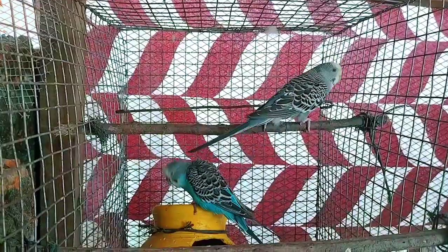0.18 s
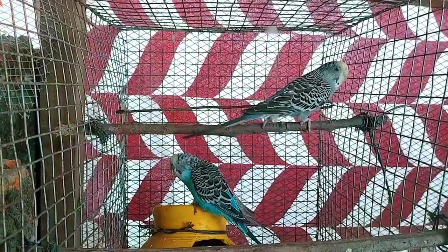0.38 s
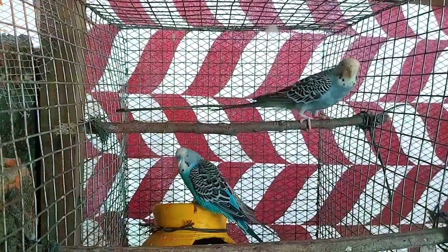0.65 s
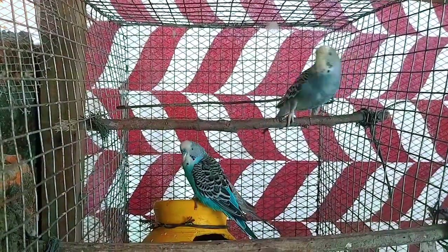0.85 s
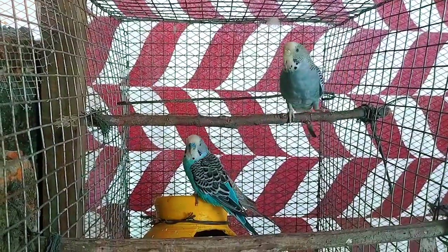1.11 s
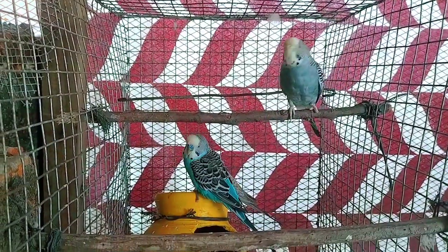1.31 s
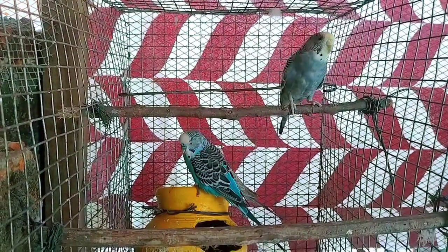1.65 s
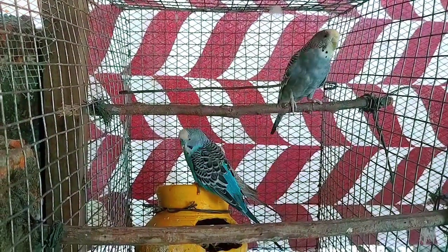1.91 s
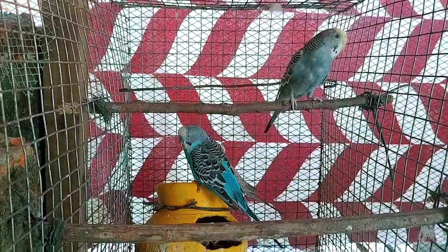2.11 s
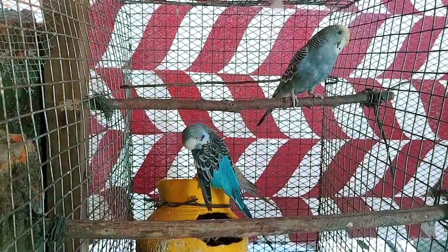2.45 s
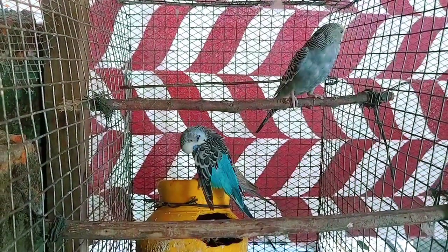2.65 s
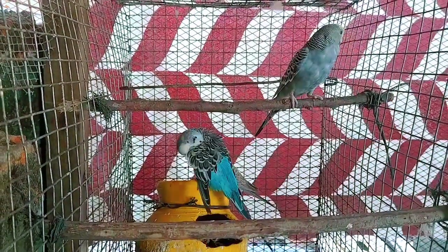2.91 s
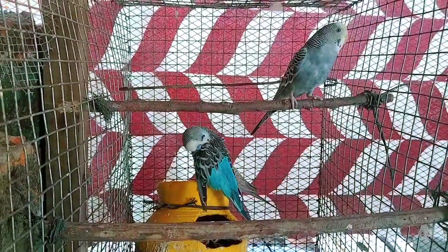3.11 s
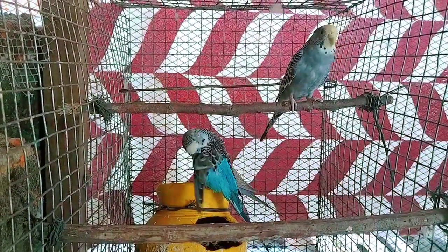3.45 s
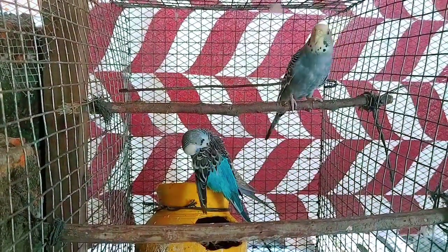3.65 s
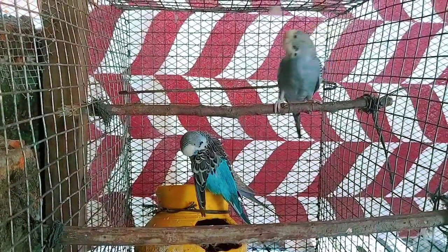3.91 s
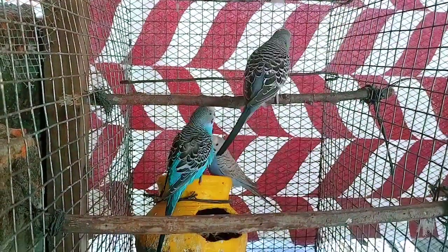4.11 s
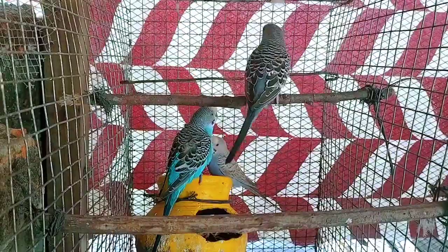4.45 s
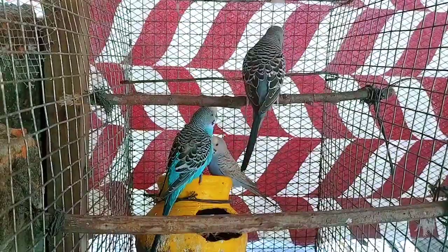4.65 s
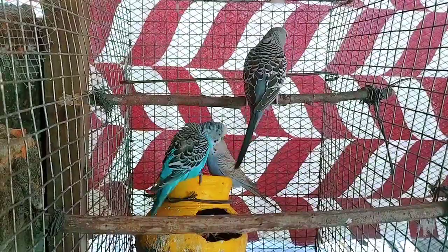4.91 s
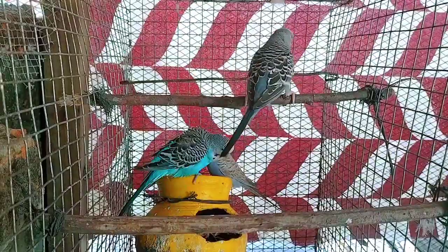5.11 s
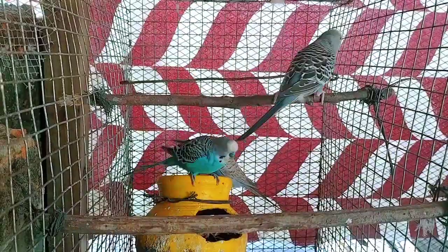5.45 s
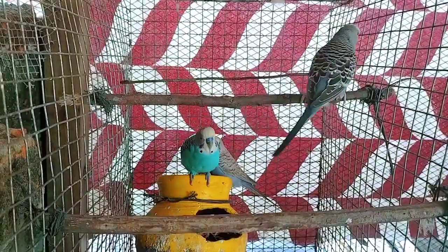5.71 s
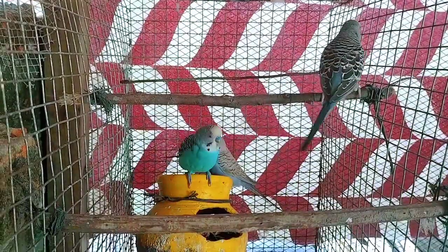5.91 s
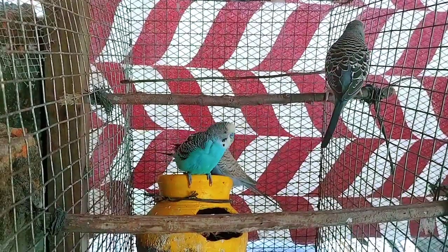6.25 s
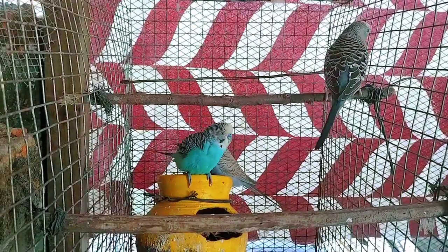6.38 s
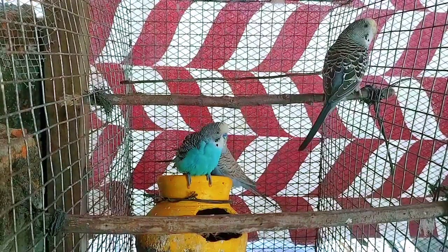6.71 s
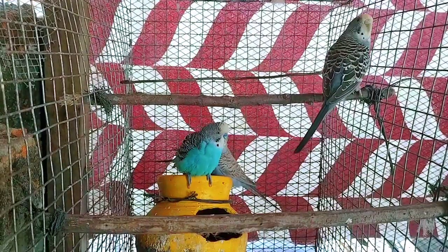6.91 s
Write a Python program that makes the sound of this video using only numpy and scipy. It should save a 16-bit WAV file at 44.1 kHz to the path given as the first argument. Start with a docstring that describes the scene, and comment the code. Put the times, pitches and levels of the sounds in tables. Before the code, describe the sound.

Close single-microphone sound of small caged parrots, with short hard reflections around each note. Chirps are very brief, gliding, sometimes pure, sometimes raspy, grouped in irregular bursts with gaps between. One dry buzzing scold comes early; a low quiet chatter appears past the middle and again near the end. Light ticks, faint hisses and rustling fill some gaps above a weak distant rumble, and a small knock closes it.

```python
"""An echoing aviary, budgerigars chirping and warbling around one microphone for about seven seconds.
Their notes are short gliding syllables, pure or raspy: a fluttering source coloured by throat and beak.
Harsh chacks are trains of noise pulses; rustles, throaty hisses and ticks are shaped noise; one knock is
a fading sine. Filtered noise and a few wavering sines make the low rumble and hum. All but the background
and the knock get wall echoes."""
import sys
import numpy as np
from scipy import signal
from scipy.fft import rfft, irfft, next_fast_len
from scipy.io import wavfile
from scipy.ndimage import map_coordinates

SR = 44100
rng = np.random.default_rng(int(sys.argv[2]) if len(sys.argv) > 2 else 0)


def unload_audio(sound):
    """Save the sound as a 16-bit wav file, at the path given as the first command line argument."""
    columns = np.transpose(np.atleast_2d(sound))
    # keep every value between -1 and 1, then stretch to whole-number steps
    steps = np.round(np.clip(columns, -1, 1) * 32767)
    wavfile.write(sys.argv[1], SR, steps.astype(np.int16))


N = 311346  # samples

# Event levels are those of the direct sound, before fades, echoes and the microphone.
# distant rumble and air, relative spectrum: hz, density_db
AMBIENCE = [(15, -63), (25, -20.5), (54, 2), (81, -0.5), (124, -4), (260, -10), (327, -15.5), (362, -15.5),
            (559, -21.5), (635, -20.5), (1760, -25), (2270, -19.5), (5260, -28.5), (8530, -35),
            (11000, -34.5), (14300, -85), (22000, -120)]
# partials of a far machine, before the hum trim: pitch_hz, level_db
HUM = [(64.6, -64.5), (96.9, -60), (188.4, -63), (258.4, -62.5)]
# clear notes: start_s, length_s, start_hz, end_hz, level_db
WHISTLES = [(0.0, 0.015, 1620, 1630, -49), (.074, 0.0077, 3650, 3520, -22.5),
            (0.088, .026, 3530, 3604, -27.5), (1.368, 0.032, 2772, 2678, -25.5),
            (1.593, 0.03, 3560, 3505, -44), (1.649, 0.023, 2848, 2652, -31.5),
            (1.674, 0.049, 2923, 2717, -27), (1.862, 0.022, 3270, 3400, -39.5),
            (1.934, 0.011, 3430, 3494, -26.5), (1.945, 0.04, 2781, 2891, -24.5),
            (1.986, 0.035, 2932, 2970, -22.5), (2.15, 0.05, 2140, 2080, -59.5),
            (2.752, 0.031, 2833, 3267, -23.5), (2.78, 0.07, 3255, 3193, -29),
            (3.071, .037, 2930, 3280, -41.5), (3.519, 0.03, 2910, 2645, -37.5),
            (3.573, .075, 2560, 3285, -31), (3.634, 0.044, 3065, 2680, -25),
            (3.865, 0.038, 2960, 3500, -39.5), (4.935, 0.027, 2843, 3126, -29),
            (4.96, .037, 2626, 2482, -29), (5.18, .016, 3230, 2802, -25.5), (5.263, 0.017, 2630, 2443, -28),
            (6.909, 0.036, 2858, 3112, -25.5)]
# scratchy notes: start_s, length_s, start_hz, end_hz, rasp (0-1), level_db
RASPS = [(0.014, .018, 2964, 4040, 0.82, -39.5), (0.033, 0.035, 2860, 3600, 0.22, -30),
         (0.069, 0.023, 2700, 2770, 0.68, -31), (0.084, 0.027, 4400, 4680, 0.43, -40.5),
         (0.112, 0.0251, 3000, 2647, 0.42, -24.5), (1.26, 0.042, 2124, 2576, 0.34, -36.5),
         (1.31, 0.047, 3200, 2983, .42, -31.5), (1.728, .014, 2757, 2515, 0.3, -30.5),
         (1.901, 0.033, 2276, 2646, 0.47, -39), (2.37, 0.051, 1866, 2380, 0.36, -43),
         (2.422, .08, 2640, 3170, 0.4, -42), (2.655, 0.014, 1650, 3250, 0, -37),
         (2.658, .048, 3800, 2970, 0.82, -39), (2.702, 0.048, 2983, 2726, 0.37, -25.5),
         (2.817, 0.046, 2784, 2542, 0.4, -34.5), (3.154, .022, 2396, 2350, 0.58, -36),
         (3.54, 0.036, 1740, 2417, .33, -41), (3.931, 0.036, 3986, 3514, 0.17, -42.5),
         (3.94, 0.046, 2140, 2460, 0.58, -44), (4.873, 0.011, 3690, 2430, 0.7, -37.5),
         (4.893, 0.022, 2798, 2857, 0.33, -26), (4.997, 0.034, 2745, 2206, 0.46, -34.5),
         (5.196, 0.057, 2850, 2890, 0.29, -29), (6.083, 0.21, 2095, 2363, 1, -53),
         (6.384, 0.039, 2010, 1950, 0.88, -42), (6.81, 0.015, 3650, 3570, .55, -31),
         (6.822, 0.029, 2350, 2332, 0.38, -36.5), (6.853, 0.07, 2850, 2860, 0.45, -29),
         (6.96, 0.028, 2720, 2434, .3, -32)]
# soft rustles and throaty hisses: start_s, length_s, centre_hz, width_octaves, level_db
RUSTLES = [(0.532, 0.25, 4770, 0.33, -64), (1.121, 0.09, 2370, 0.39, -45), (2.135, 0.19, 4920, 0.5, -60.5),
           (2.326, 0.16, 4200, 0.33, -58.5), (4.608, 0.23, 6060, 0.36, -59.5),
           (5.578, 0.2, 8000, 0.26, -65.5), (5.862, 0.045, 5900, 0.45, -57), (5.869, 0.057, 1400, 1, -55.5),
           (6.037, 0.073, 5300, 0.55, -54.5), (6.104, 0.16, 3380, 0.36, -56.5),
           (6.386, 0.0256, 1000, 0.61, -52), (6.739, 0.026, 885, 0.66, -59)]
# toneless buzzes: start_s, rise_s, fall_s, level_db
CHACKS = [(0.774, 0.034, 0.015, -42), (0.89, 0.023, 0.008, -35.5), (0.921, 0.0014, 0.045, -27.5)]
# relative spectrum of the chack: hz, density_db
CHACK_COLOUR = [(410, -72), (700, -35.5), (2080, -8.5), (2350, -7), (3290, -1), (3670, -5), (5670, -8),
                (6550, 3.5), (7490, -11.5), (8460, -6), (10000, -11), (13000, -21), (22000, -120)]
# short low hooks that open or close a phrase: start_s, pitch_hz (at the end), level_db
HOOKS = [(1.245, 1812, -37), (1.623, 1610, -43), (1.877, 1545, -40), (2.342, 1628, -40.5),
         (2.547, 1338, -42), (2.867, 1370, -38.5), (3.045, 1890, -43.5), (3.475, 1688, -43.5),
         (3.681, 1604, -39), (3.83, 1900, -44), (4.861, 1796, -43.5), (5.023, 1150, -43.5),
         (5.134, 1820, -39.5), (5.158, 1817, -43), (6.989, 1460, -42)]
# steep downward slurs; the first is the strong octave of the opening hook:
# start_s, pitch_hz (at the end), level_db
SLURS = [(1.245, 3490, -34.5), (1.287, 3024, -24.5), (1.322, 3320, -33.5), (1.34, 2820, -38),
         (1.384, 2324, -32.5), (3.109, 3215, -40), (3.135, 2800, -40), (3.902, 3600, -39.5),
         (3.912, 2520, -36.5), (5.276, 3330, -39.5)]
# beak and claw contacts: start_s, peak_db
TICKS = [(2.338, -40.5), (3.226, -46), (3.286, -42.5), (3.386, -44.5), (3.795, -62), (4.189, -37.5),
         (4.239, -36.5), (6.067, -54)]
# soft low notes, sung with the octave strong: start_s, length_s, start_hz, end_hz, rasp (0-1), level_db
WARBLES = [(4.266, 0.067, 1089, 1274, .5, -45), (4.364, 0.11, 968, 1135, 0.4, -46.5),
           (4.477, 0.048, 1259, 1347, .25, -43), (4.521, 0.068, 1111, 1087, 0.47, -45),
           (4.598, 0.07, 1190, 1311, 0.5, -50), (4.666, 0.041, 1175, 1186, 0.17, -45),
           (4.727, 0.043, 1420, 1378, 0.28, -37), (4.781, 0.041, 1374, 1536, 0.96, -46),
           (5.546, 0.019, 1137, 1026, .7, -52.5), (6.242, .08, 1430, 1490, .1, -49),
           (6.321, .062, 1500, 2020, .04, -39.5), (6.452, .047, 1680, 1490, .04, -37.5),
           (6.492, 0.0343, 1472, 1393, 0.23, -31), (6.543, .02, 1550, 1470, 0.74, -41),
           (6.577, 0.0588, 1470, 1311, 0.08, -34), (6.677, 0.036, 1384, 1383, 0.3, -34.5),
           (6.727, .03, 1454, 1793, 0.69, -41)]
# the throat favours partials near 2.8 kHz: hz, gain_db
THROAT = [(1100, -4.5), (1400, -15), (1700, -2), (2300, -0.5), (2800, -0.5), (3400, -4), (3900, -9.5),
          (4250, -20), (5800, -33), (7000, -28.5), (8700, -32.5), (11500, -36.5), (15000, -33)]
# how the beak is held in each phrase: start_s, treble_db, beak_resonance_hz
PHRASES = [(0, 2, 7300), (1.2, 13.5, 9600), (1.355, 31, 5630), (1.5, 10, 8400), (1.635, 12, 8800),
           (1.82, 9, 7260), (1.94, 21, 10800), (2.1, 0, 7700), (3.78, 21, 5900), (4.1, 17.5, 5800),
           (4.33, -1.5, 6400), (4.83, -2.5, 4740), (5.11, 3.5, 4650), (6.0, 7.5, 7760), (6.42, 14, 5100),
           (6.485, -1.5, 7150), (6.78, 1.5, 8300)]
# the beak's colour sets in between these: low_hz, high_hz
TREBLE_HZ = (3150, 4670)
# echo decay time of the walls: hz, t60_s
WALLS = [(1500, 0.65), (3000, 0.62), (10000, 0.48)]
# response of the microphone and its port: hz, gain_db
MICROPHONE = [(8800, -2), (9600, -6.5), (10200, -18), (11000, -4), (12000, -10), (13200, -40), (14500, -29),
              (15500, -23)]

TOP_HZ = 15600  # band limit
FLUTTER = 0.201  # scale of the random pitch swing at full rasp, as a share of the pitch
SOURCE_DB_PER_OCTAVE = -3.5  # fall of the overtones at the syrinx
BEAK_DB, BEAK_OCTAVES = 8, 0.25  # height and width of the beak resonance


def amp(db):
    """Decibels to gain."""
    return 10 ** (np.asarray(db) / 20)


def unit(x):
    """Scale to rms 1."""
    return x / np.sqrt(np.mean(x ** 2) + 1e-20)


def along(points, hz):
    """Read (hz, value) points on a log frequency axis."""
    point_hz, values = np.transpose(points)
    return np.interp(np.log(hz + 1), np.log(point_hz + 1), values)


def filtered(x, response):
    """Shape the spectrum of x by a gain that is a function of frequency."""
    size = next_fast_len(len(x) + 4096)
    gain = response(np.fft.rfftfreq(size, 1 / SR))
    return irfft(rfft(x, size) * gain, size)[:len(x)]


def band(x, centre_hz, width):
    """Keep a bell-shaped band, width in octaves."""
    return filtered(x, lambda hz: np.exp(-.5 * (np.log2((hz + 1) / centre_hz) / width) ** 2))


def wobble(t, rate):
    """A smooth random curve at times t, rate knots a second."""
    return map_coordinates(rng.standard_normal(1024), [t * rate], mode="wrap")


def add(track, s, sound):
    """Mix a sound in at time s."""
    part = track[max(round(s * SR), 0):][:len(sound)]
    part += sound[:len(part)]


def aviary(sound, wet_db, build=0.0032, walls_db=-3, first=.005, spread=.04):
    """Direct sound, a few early wall echoes and a diffuse tail, new for each sound because the birds keep moving.

    wet_db sets the echoes against the direct sound; build, first and spread are in seconds."""
    hz, t, grains = signal.stft(rng.standard_normal(SR * 2 // 3), SR, nperseg=256)
    decay = amp(-60 * t / along(WALLS, hz)[:, None]) * (1 - np.exp(-t / build))
    tail = signal.istft(grains * decay, SR, nperseg=256)[1]
    delays = first + spread * rng.random(size=7)
    echoes = np.bincount((delays * SR).astype(int), rng.standard_normal(len(delays)), len(tail))
    heard = signal.fftconvolve(sound, unit(tail) + amp(walls_db) * unit(echoes))
    heard *= amp(wet_db) * np.linalg.norm(sound) / (np.linalg.norm(heard) + 1e-20)
    add(heard, 0, sound)
    return heard


def colour(hz, s):
    """Gain in dB of the throat and beak at frequency hz, for a note sung at time s."""
    starts = [phrase[0] for phrase in PHRASES]
    _, treble_db, beak_hz = PHRASES[np.searchsorted(starts[1:], s)]
    resonance = np.exp(-.5 * (np.log2(hz / beak_hz) / BEAK_OCTAVES) ** 2)
    beak = treble_db + BEAK_DB * resonance
    return along(THROAT, hz) + beak * np.interp(hz, TREBLE_HZ, [0, 1])


def syllable(s, length, start_hz, end_hz, rasp, settle, shimmer_db, sag_db, rise, flutter_hz=1300, fall=0.12):
    """The syrinx glides and settles on a pitch, shaken by a slow waver and a fast flutter of its membranes.

    rise and fall are shares of the length; a higher settle reaches the end pitch sooner."""
    t = np.arange(int(length * SR)) / SR
    u = t / length
    arc = end_hz + (start_hz - end_hz) * (1 - u) ** settle
    waver = .007 * wobble(t, 200)
    flutter = FLUTTER * rasp * wobble(t, flutter_hz)
    pitch = arc * (1 + waver + flutter)
    phase = 2 * np.pi * np.cumsum(pitch) / SR

    k = np.arange(1, 8)[:, None]  # partial numbers
    level = SOURCE_DB_PER_OCTAVE * np.log2(k) + colour(k * arc, s)
    gain = amp(level - level.max(axis=0)) * (k * pitch < TOP_HZ)
    tone = unit(np.sum(gain * np.sin(k * phase), axis=0))

    # the air pressure trembles, and sags (or swells, if the sag is negative) as the note goes on
    pressure = unit(amp(shimmer_db * wobble(t, 328.5) - sag_db * u))
    fade = np.minimum(1, np.minimum(u / rise, (1 - u) / fall))
    return tone * pressure * fade


def background(rumble_db=-51.0, hum_db=-2):
    """Distant rumble and air, with the phase-wavering hum of a far machine."""
    t = np.arange(N) / SR
    air = unit(filtered(rng.standard_normal(N), lambda hz: amp(along(AMBIENCE, hz))))
    hum = np.zeros(N)
    for hz, db in HUM:
        hum += amp(db) * np.sqrt(2) * np.sin(2 * np.pi * hz * t + 1.2 * wobble(t, 10))
    return amp(rumble_db) * air + amp(hum_db) * hum


def whistles(rasp=0.083):
    """Clear notes with a slight burr that slide quickly onto their pitch."""
    track = np.zeros(N)
    for s, length, start_hz, end_hz, db in WHISTLES:
        voice = syllable(s, length, start_hz, end_hz, rasp, settle=2.633, shimmer_db=2.5, sag_db=-2.5, rise=0.088)
        add(track, s, amp(db) * aviary(voice, wet_db=0.93))
    return track


def rasps():
    """Scratchy notes: a fast flutter, deeper with rasp, smears each partial into a band and breaks it into pulses."""
    track = np.zeros(N)
    for s, length, start_hz, end_hz, rasp, db in RASPS:
        voice = syllable(s, length, start_hz, end_hz, rasp, settle=1.4, shimmer_db=5.0, sag_db=4, rise=0.09)
        add(track, s, amp(db) * aviary(voice, wet_db=4))
    return track


def rustles(grain_db=4):
    """Feathers, feet and hoarse throats make soft grainy strokes of band noise."""
    track = np.zeros(N)
    for s, length, centre_hz, width, db in RUSTLES:
        t = np.arange(int(length * SR)) / SR
        grains = rng.standard_normal(len(t)) * amp(grain_db * wobble(t, 254))
        hiss = unit(band(grains, centre_hz, width))
        stroke = hiss * signal.windows.tukey(len(t), .6)
        add(track, s, amp(db) * aviary(stroke, wet_db=4.5))
    return track


def chacks(pulse_hz=150, damping=1.6):
    """A harsh call: a quick, uneven train of decaying noise pulses that swells and stops."""
    track = np.zeros(N)
    for s, rise, fall, db in CHACKS:
        t = np.arange(int((rise + fall) * SR)) / SR
        cycle = (t * pulse_hz + 0.36 * wobble(t, 67)) % 1
        pulses = rng.standard_normal(len(t)) * np.exp(-damping * cycle)
        buzz = unit(filtered(pulses, lambda hz: amp(along(CHACK_COLOUR, hz))))
        swell = np.interp(t, [0, rise, rise + fall], [.2, 1, .2])
        add(track, s, amp(db) * aviary(buzz * swell, wet_db=0))
    return track


def flicks(rows, length, drop, rasp):
    """Very short sounds of one shape, each dropping onto its pitch from drop times above."""
    track = np.zeros(N)
    for s, hz, db in rows:
        voice = syllable(s, length, drop * hz, hz, rasp, settle=1.98, shimmer_db=5.5, sag_db=1.5, rise=0.11)
        add(track, s, amp(db) * aviary(voice, wet_db=3.0))
    return track


def hooks():
    """Low, fairly clean notes whose syrinx pitch falls briefly at the edge of a phrase."""
    return flicks(HOOKS, length=0.0211, drop=1.23, rasp=0.074)


def slurs():
    """Shorter, rougher, steeper falls of pitch; the first is the strong octave of the opening hook."""
    return flicks(SLURS, length=0.01664, drop=1.27, rasp=0.19)


def ticks(centre_hz=8500, width=1.0, t60=0.016):
    """Beaks and claws tick lightly on perch and wire: fast-fading bursts of band noise."""
    track = np.zeros(N)
    t = np.arange(SR // 50) / SR
    for s, db in TICKS:
        tick = band(rng.standard_normal(len(t)) * amp(-60 * t / t60), centre_hz, width)
        add(track, s, amp(db) * aviary(tick / np.abs(tick).max(), wet_db=3.5))
    return track


def warbles():
    """Quiet chatter pitched so low that the throat lifts the octave above the fundamental."""
    track = np.zeros(N)
    for s, length, start_hz, end_hz, rasp, db in WARBLES:
        voice = syllable(s, length, start_hz, end_hz, rasp, settle=1.76, shimmer_db=2.5, sag_db=-1, rise=0.07)
        add(track, s, amp(db) * aviary(voice, wet_db=1.2))
    return track


def bump(s=7.034, hz=640, db=-29, t60=0.019):
    """A small dull knock close by: one damped sine with a soft onset and no echo."""
    track = np.zeros(N)
    t = np.arange(SR // 20) / SR
    onset = 1 - np.exp(-t / 0.00079)
    add(track, s, amp(db - 60 * t / t60) * np.sin(2 * np.pi * hz * t) * onset)
    return track


def scene():
    """Everything at one microphone."""
    song = whistles() + rasps() + hooks() + slurs() + warbles()
    return (background() + song + rustles() + chacks() + ticks() + bump())[None]


def record(dry):
    """The microphone port notches the treble; nothing passes the band limit."""
    return filtered(dry[0], lambda hz: amp(along(MICROPHONE, hz)) * (hz < TOP_HZ))[None]


dry = scene()
out = record(dry)
unload_audio(out)
```